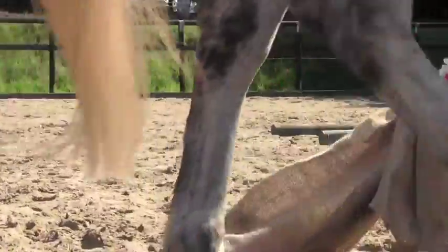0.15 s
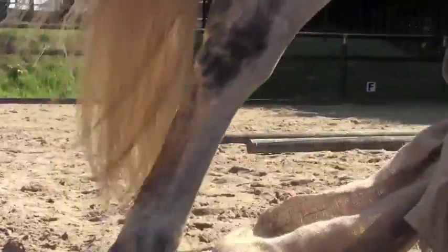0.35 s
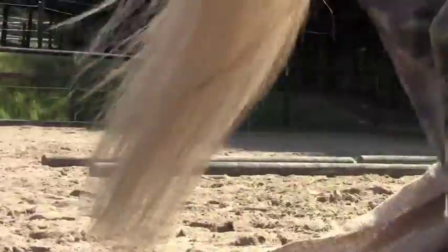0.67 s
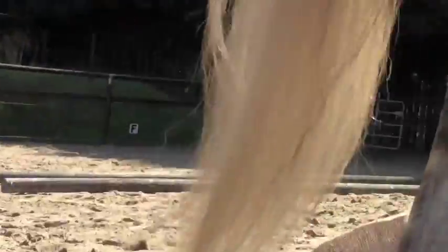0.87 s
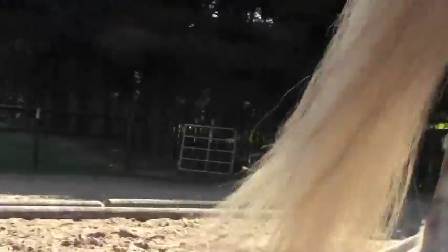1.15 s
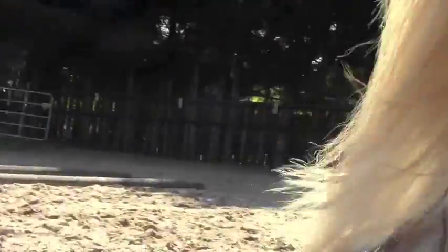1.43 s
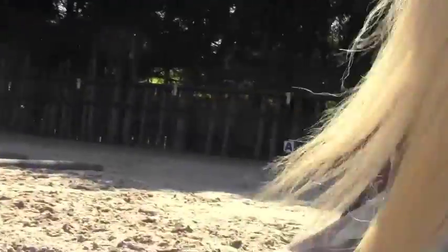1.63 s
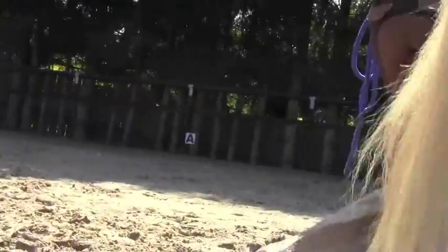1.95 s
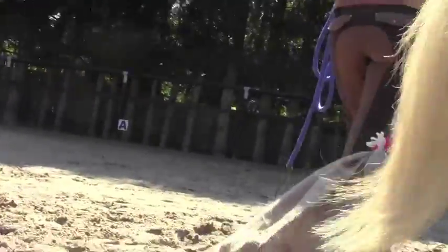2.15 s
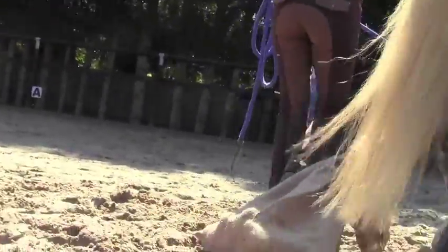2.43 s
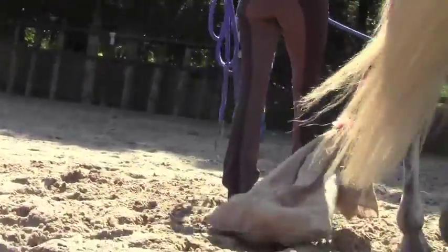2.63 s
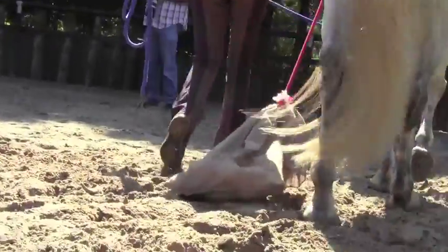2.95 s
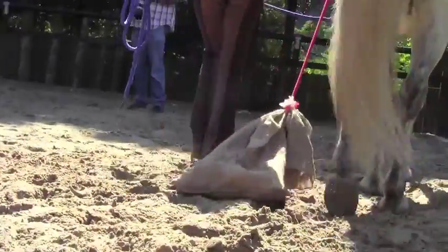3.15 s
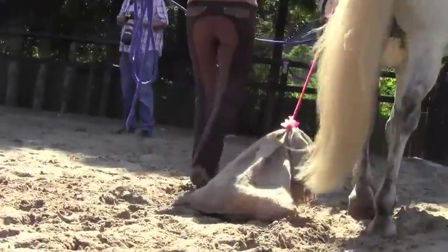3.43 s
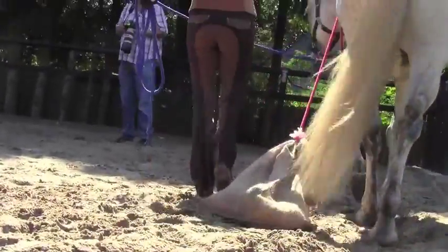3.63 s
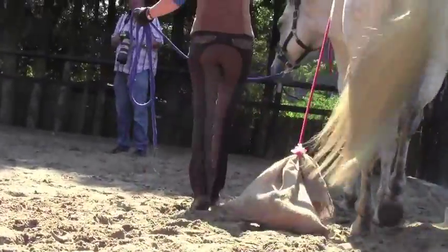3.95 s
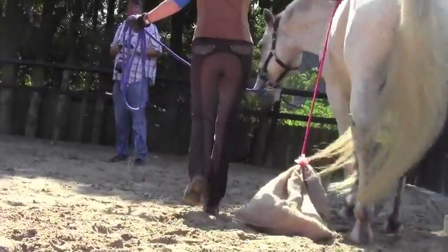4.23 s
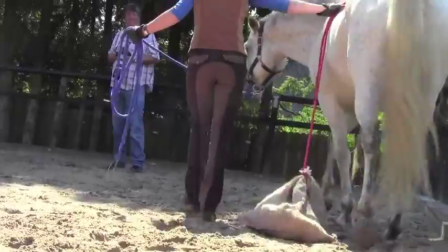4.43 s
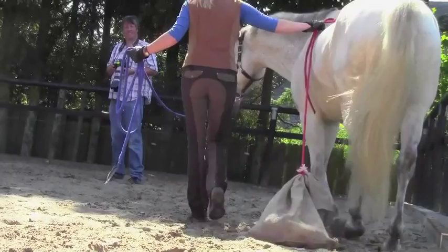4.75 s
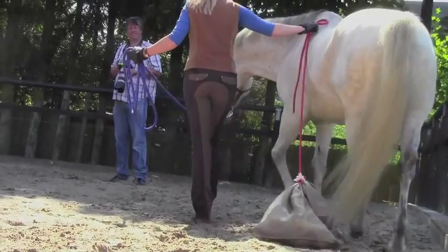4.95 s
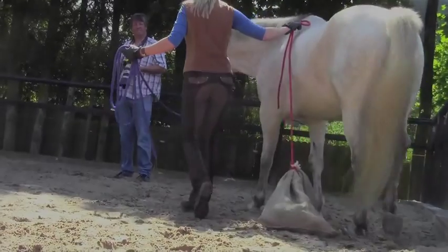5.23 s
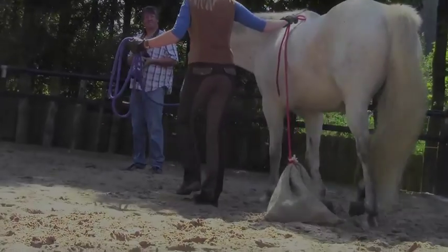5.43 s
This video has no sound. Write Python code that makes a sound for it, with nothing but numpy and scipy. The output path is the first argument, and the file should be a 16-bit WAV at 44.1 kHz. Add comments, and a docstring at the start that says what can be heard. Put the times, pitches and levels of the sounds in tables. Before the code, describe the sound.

Empty plastic bottles knock hollowly in a cloth sack a horse drags over sand, growing fainter, with soft hoof thuds and distant birds.

```python
"""Empty plastic bottles knock hollowly in a cloth sack as a horse drags it away, off to the left.
Each bump rings the air and walls of a bottle, hard caps tick, and cloth and hooves scuff and thud
in the sand of an arena. A distant bird gives blurred, falling whistles, with a lower call farther off.
Behind it all are the outdoor hush and a light breeze that rumbles and bumps on the microphone."""
import sys
import numpy as np
from scipy import signal
from scipy.fft import rfft, irfft, next_fast_len
from scipy.io import wavfile
from scipy.ndimage import uniform_filter1d

SR = 44100
rng = np.random.default_rng(int(sys.argv[2]) if len(sys.argv) > 2 else 0)


def master_out(mix):
    """Clip the mix to full scale and print it as 16-bit PCM to the path in sys.argv[1]."""
    frames = np.transpose(np.atleast_2d(mix))
    ceiling = np.clip(frames, -1, 1)
    pcm = np.round(ceiling * 32767).astype(np.int16)
    wavfile.write(sys.argv[1], SR, pcm)


N = 246149

# Bottle hitting bottle: start_s, level_db, air_hz, wall_hz, wall_db, neck_db, tumble_s
# (wall_db and neck_db are added to level_db, the level of the hollow air note)
BOTTLE_KNOCKS = [(.014, -24, 390, 720, -3, -7, 0.0061), (.086, -21.5, 427, 840, 0, -15, 0.026),
                 (.109, -25.5, 470, 740, -16, -6, 0.016), (0.124, -19, 402, 800, -3.5, -1.5, 0.017),
                 (0.144, -19, 418, 1010, 6.5, -12, 0.0056), (.186, -19, 506, 797, -2.5, -12, 0.019),
                 (0.234, -18.5, 460, 1090, -6, -10, 0.0081), (.298, -14.5, 400, 1093, -5.5, -4.5, 0.023),
                 (0.373, -15.5, 536, 870, -3.5, 0.5, 0.017), (.411, -19.5, 405, 740, -3, -3.5, 0.042),
                 (.454, -23.5, 450, 1293, -1, -5.5, 0.012), (.559, -20, 434, 900, -7, -3.5, 0.015),
                 (.569, -27, 407, 992, 14, 4, 0.012), (.581, -18, 410, 974, 2, -18, 0.0069),
                 (.592, -16, 436, 940, -1.5, -3.5, 0.0071), (.659, -26.5, 465, 900, -2, -11, 0.0072),
                 (.711, -22.5, 404, 876, -1, -2.5, 0.035), (.752, -22, 475, 890, 1, -7, 0.018),
                 (.803, -26, 490, 900, -2, 3, 0.012), (.814, -15, 437, 915, -2, -3.5, 0.02),
                 (.947, -26.5, 524, 836, -2, -2.5, 0.015), (.972, -26.5, 390, 1120, -6.5, -4.5, 0.026),
                 (1.016, -30.5, 502, 770, -2, -3, 0.0054), (1.037, -46, 455, 866, -10, 8, 0.0058),
                 (1.101, -31, 462, 850, 9.5, 8, 0.013), (1.145, -27, 450, 880, -1, -2, 0.044),
                 (1.195, -31.5, 644, 870, 4.5, -2, 0.048), (1.211, -32.5, 500, 820, 6, 6.5, 0.012),
                 (1.243, -41, 426, 865, 13, -6, .012), (1.31, -17, 476, 804, -2.5, -9.5, 0.023),
                 (1.334, -18, 492, 835, -2.5, -7, 0.02), (1.458, -22, 516, 840, -3.5, -11, 0.0071),
                 (1.515, -32, 580, 890, 2, 0, 0.021), (1.537, -15.5, 505, 843, -2, -10, .012),
                 (1.553, -20, 507, 960, 2, -11, 0.018), (1.574, -16.5, 530, 883, -2.5, -16, 0.0057),
                 (1.597, -15.5, 487, 850, -10, -6, 0.019), (1.666, -30, 530, 800, -13, -4, .006),
                 (1.718, -16.5, 500, 906, 0, -0.5, 0.023), (1.807, -25, 430, 844, -0.5, -10, 0.027),
                 (1.853, -22.5, 430, 756, -2, -1.5, 0.023), (1.885, -28.5, 446, 805, 2.5, -2.5, 0.047),
                 (1.973, -22, 429, 780, -2.5, -2, 0.023), (2.063, -28, 542, 836, 3, -1, 0.015),
                 (2.086, -29, 467, 820, -3, -1, 0.023), (2.211, -27.5, 480, 800, -8, -5.5, 0.039),
                 (2.312, -25.5, 648, 790, -8, -6, 0.047), (2.405, -30.5, 470, 805, -11, -2.5, 0.0099),
                 (2.448, -34, 483, 820, -3, 7, 0.0071), (2.457, -9.5, 399, 774, -8.5, -7, 0.013),
                 (2.487, -16, 477, 800, -14, -6, 0.019), (2.525, -16, 509, 840, -14.5, -7, 0.012),
                 (2.665, -18, 416, 720, -20, -12, 0.066), (2.703, -18.5, 468, 795, -17, -23, 0.04),
                 (2.731, -17, 590, 840, -20, -3, 0.0099), (2.771, -23.5, 495, 1040, -3, -4, 0.027),
                 (2.786, -31, 500, 855, -3, 5, .012), (2.826, -27, 406, 695, -8, -7, 0.044),
                 (2.924, -22, 477, 730, -24, -15, 0.021), (2.95, -22.5, 550, 626, -12, -4, 0.052),
                 (2.972, -12.5, 473, 900, -8.5, -10.5, 0.013), (3.025, -21, 420, 754, -5.5, -10.5, 0.036),
                 (3.145, -39, 655, 705, -16, -9, 0.009), (3.186, -30.5, 606, 740, -25, -12, 0.014),
                 (3.323, -33.5, 480, 785, -5, -12, 0.011), (3.441, -28.5, 426, 686, -11, -7, 0.03),
                 (3.5, -30.5, 573, 670, -10, -13, 0.02), (3.659, -32, 563, 700, -12, -4.5, 0.035),
                 (3.678, -28, 348, 664, -5, -8.5, 0.027), (3.755, -37.5, 515, 783, 3, -1, .02),
                 (3.774, -35, 664, 760, 7, -2, 0.0073), (3.8, -24, 644, 720, -12, -21, 0.016),
                 (3.843, -27, 414, 840, -10, -29, 0.022), (3.892, -25, 480, 789, -14, -11, .02),
                 (3.909, -25.5, 545, 750, -5, -12.5, 0.017), (3.992, -20.5, 410, 790, -12, -25, 0.034),
                 (4.047, -28, 594, 810, -19, -13, 0.0057), (4.099, -33.5, 570, 910, -15, -12, 0.0092),
                 (4.127, -29.5, 468, 830, -2, -12, 0.06), (4.217, -36.5, 534, 734, 2, -22, 0.025),
                 (4.254, -17.5, 420, 712, -6.5, -15, 0.03), (4.306, -32, 480, 690, 1, -9, 0.075),
                 (4.34, -28, 618, 673, 3.5, -8, 0.038), (4.398, -29.5, 497, 690, -3.5, -24, 0.0094),
                 (4.516, -32.5, 410, 670, -3, -14, 0.0089), (4.647, -32.5, 595, 781, -17, -27, 0.045),
                 (4.671, -30, 620, 696, -13, -24, .012), (4.692, -27, 648, 700, -12, -12.5, 0.018),
                 (4.706, -27, 513, 756, 0, -3, 0.02), (4.764, -28, 483, 730, -25, -13, 0.012),
                 (4.799, -23.5, 422, 682, -8, -17, 0.035), (4.837, -29.5, 550, 780, -19, -10, 0.016),
                 (4.967, -24, 420, 736, -6, -21, 0.019), (5.018, -28, 667, 940, -0.5, -7.5, 0.04),
                 (5.11, -29, 384, 737, -6, -17, 0.02), (5.155, -32, 584, 805, -12, -11, 0.0094),
                 (5.197, -33.5, 454, 910, 4, -11, 0.0096), (5.334, -35, 384, 1024, -11, -10, .03),
                 (5.413, -39, 440, 887, -1, -25, 0.014), (5.552, -37.5, 610, 850, -12, -11, .01)]
# Notes of a bottle's stiff neck: pitch_hz, level_db
NECK_NOTES = [(1370, 16), (1640, 17), (1770, 7), (2000, -43)]
# Notes of its thin panels: pitch_hz, level_db
PANEL_NOTES = [(2340, -39), (2580, 26), (3100, 20.5), (3450, 2.5), (4080, 9)]


def bottle_knocks():
    """Each knock is a short tumble of taps that rings one bottle's air, walls, neck and panels."""
    out, t = np.zeros(N), np.arange(3000) / SR
    hit_spots = rng.random((len(BOTTLE_KNOCKS), 24))
    rubs, catches = rng.standard_normal((2, len(BOTTLE_KNOCKS), 4, len(t)))
    for knock, spot, rub, catch in zip(BOTTLE_KNOCKS, hit_spots, rubs, catches):
        start_s, level_db, air_hz, wall_hz, wall_db, neck_db, tumble_s = knock
        contact = (1 - np.exp(-t / 0.0031)) * np.exp(-(t / max(tumble_s, .002)) ** 2)
        taps = contact * rub * (0.28 + (catch > 2.2))
        # the first touch is one firm tap
        strength = np.sqrt((taps ** 2).sum(1, keepdims=True))
        taps[:, :12] += 0.31 * strength * np.hanning(12) / 2
        # higher notes die sooner
        air = ring(taps[0], [(air_hz, 0), (1.27 * air_hz, -8)], [.5, spot[0]], fade_s=0.047)
        wall = ring(taps[1], [(wall_hz, 0), (1.163 * wall_hz, -14)], [.5, spot[1]], fade_s=0.033)
        neck = ring(taps[2], NECK_NOTES, spot[8:], fade_s=0.022)
        panels = ring(taps[3], PANEL_NOTES, spot[14:], fade_s=0.0066)
        for part, part_db in (air, 0), (wall, wall_db), (neck, neck_db), (panels, neck_db - 6):
            add(out, start_s, with_peak(part, level_db + part_db))
    return out


def ring(taps, notes, hit_spots, fade_s):
    """Taps ring notes that drop 60 dB in fade_s. Where the blow lands shifts their pitch and level."""
    t = np.arange(len(taps)) / SR
    tone = np.zeros(len(t))
    for (pitch_hz, level_db), spot in zip(notes, hit_spots):
        shifted_hz = pitch_hz * (1 + 0.097 * (spot - .5))
        tone += gain(level_db + 16 * spot - 60 * t / fade_s) * np.sin(2 * np.pi * shifted_hz * t)
    soft_start = 1 - np.exp(-t / (0.018 * fade_s))
    return signal.fftconvolve(taps, soft_start * tone)


# Caps and creases snapping: start_s, level_db, fade_s
CAP_TICKS = [(0.048, -31, .006), (0.126, -37, 0.0033), (0.138, -33, 0.0038), (0.298, -27.5, 0.0028),
             (0.3135, -24, 0.0045), (0.373, -28, 0.0028), (0.382, -27, 0.0038), (0.558, -31, 0.002),
             (0.711, -32, 0.0011), (0.753, -29.5, 0.0033), (0.802, -30, 0.0057), (0.979, -33, 0.01),
             (1.101, -28.5, 0.0038), (1.241, -32, 0.0043), (1.309, -23.5, 0.0027), (1.335, -27, .0047),
             (1.342, -28, .0017), (1.46, -32, 0.0025), (1.537, -25, .0021), (1.542, -17, 0.00069),
             (1.555, -29, 0.0013), (1.569, -27, 0.0029), (1.576, -19, 0.0018), (1.5975, -30, 0.0022),
             (1.6135, -27, .0024), (1.704, -27, 0.0017), (1.7205, -15.5, 0.0032), (1.7321, -22.5, 0.00098),
             (1.8226, -26, 0.0016), (1.837, -29, .0012), (1.856, -27, 0.0022), (1.871, -26.5, 0.00081),
             (1.982, -41, 0.0025), (2.075, -30, .0019), (2.137, -36, 0.003), (2.2099, -28.5, 0.0078),
             (2.242, -35.5, .0022), (2.31, -28, 0.0051), (2.325, -25, 0.003), (2.4545, -22.5, 0.0053),
             (2.4675, -24, 0.00081), (2.481, -22, 0.002), (2.526, -29, 0.0033), (2.725, -26, 0.003),
             (2.9, -31.5, 0.0011), (2.963, -28.5, 0.0045), (2.975, -29, 0.005), (3.2849, -37.5, 0.014),
             (3.693, -33.5, 0.0084), (3.802, -35.5, 0.009), (3.842, -38, .006), (3.912, -32, 0.0056),
             (3.986, -33.5, 0.0088), (4.107, -41.5, .0025), (4.253, -30, .0018), (4.269, -31.5, 0.0036),
             (4.335, -39.5, 0.0027), (4.672, -35, 0.0024), (4.797, -39, 0.0067), (4.835, -48, .004),
             (4.965, -39.5, .015), (5.112, -40.5, .0022), (5.194, -38, 0.004), (5.3513, -38.5, 0.0022)]
# Tone of the ticks: pitch_hz, boost_db
TICK_TONE = [(2500, 9), (3800, 9.5), (4900, 2.5), (5700, 5.5), (9000, 3.5), (11000, -10), (14000, -26.5),
             (15600, -42)]
# How soft ground thins the middle of far ticks: pitch_hz, boost_db
SOFT_GROUND = [(2500, -4), (5000, -4.5), (7000, -2.5), (9000, 2.5)]


def cap_ticks():
    """Hard caps and creases snap in tiny bright bursts, which thin out as the sack moves away."""
    out, t = np.zeros(N), np.arange(1000) / SR
    noises = rng.standard_normal((len(CAP_TICKS), len(t)))
    pitches_hz = 6400 + 3500 * (rng.random(len(CAP_TICKS)) - .5)
    for (start_s, level_db, fade_s), noise, pitch_hz in zip(CAP_TICKS, noises, pitches_hz):
        burst = noise * (1 - np.exp(-t / 0.00017)) * np.exp(-t / fade_s)
        tick = 1.35 * burst + resonate(burst, pitch_hz, width_hz=2500)
        add(out, start_s, with_peak(tick, level_db))
    near_s, far_s = 2, 4.4
    far = np.interp(np.arange(N) / SR, [near_s, far_s], [0, 1])
    return shape_tone((1 - far) * out + shape_tone(far * out, SOFT_GROUND), TICK_TONE)


# The sack's steady slide: time_s, bottles_db, hiss_db
SACK_SLIDE = [(0, -37, -49), (.3, -36.5, -51.5), (.55, -45, -50.5), (.85, -35, -51), (1.05, -45.5, -49),
              (1.2, -36.5, -46.5), (1.45, -48, -53), (1.85, -41, -52.5), (2.27, -48.5, -56),
              (2.61, -43, -55.5), (2.85, -37.5, -52.5), (3.1, -50.5, -54), (3.3, -46.5, -56),
              (3.58, -55, -61.5), (4.2, -42.5, -59.5), (4.52, -59, -69), (4.85, -46.5, -60.5),
              (5.25, -51, -89), (5.58, -55, -79)]
# Cloth and hooves pushing through sand: middle_s, length_s, hiss_db, bottles_db
SAND_PUSHES = [(0.127, .12, -45, -45), (0.379, 0.18, -43, -32.5), (0.568, 0.085, -42.5, -37.5),
               (0.707, 0.053, -46.5, -37), (0.824, 0.1, -44, -30.5), (1.11, 0.056, -51, -35.5),
               (1.346, 0.083, -44.5, -25.5), (1.575, 0.1, -38, -29.5), (1.719, 0.086, -43, -31),
               (1.88, 0.13, -46.5, -41.5), (1.984, .06, -49.5, -52), (2.096, 0.089, -43, -33),
               (2.21, 0.087, -52, -45), (2.336, 0.049, -46.5, -31), (2.496, 0.088, -42, -24),
               (2.713, 0.093, -43.5, -33.5), (2.785, 0.041, -46, -38), (3.001, 0.15, -49, -34.5),
               (3.667, 0.075, -58, -45), (3.814, .1, -49, -40), (3.998, .04, -48.5, -36),
               (4.124, 0.072, -56, -57), (4.264, 0.13, -53.5, -48), (4.436, 0.1, -52, -47),
               (4.701, 0.069, -53, -36.5), (4.797, 0.094, -52, -49), (5.009, 0.092, -48.5, -42)]
# Notes of many bottles stirring together: pitch_hz, width_hz, level_db
JOSTLE_NOTES = [(397.4, 41, 4.5), (498.5, 38, 4.5), (616, 35, -8.5), (777, 91, -0.5), (1030, 144, -2.5),
                (1420, 42, -13), (1680, 256, -4.5)]
# Tone of cloth on sand: pitch_hz, boost_db
SAND_TONE = [(880, -4.5), (1500, 9), (1650, -47), (2220, 4.5), (3090, 0), (4100, -3), (4990, -10.5),
             (5550, -3.5), (7890, -7), (12600, -16), (15500, -53)]


def sack_drag():
    """Countless small bumps ring the bottles, while sand grains hiss and crackle under the cloth."""
    t = np.arange(N) / SR
    push_hiss, push_bottles = np.zeros((2, N))
    for middle_s, length_s, hiss_db, bottles_db in SAND_PUSHES:
        swell = np.exp(-(2 * (t - middle_s) / length_s) ** 2)
        push_hiss += gain(hiss_db) * swell
        push_bottles += gain(bottles_db) * swell
    bottles = np.zeros(N)
    for pitch_hz, width_hz, level_db in JOSTLE_NOTES:
        bumps = clicks(per_s=260, spread_db=3.44) + 0.13 * rng.standard_normal(N)
        note = resonate(bumps, pitch_hz, width_hz)
        bottles += gain(level_db) * unit_level(resonate(note, pitch_hz, 8.6 * width_hz))
    grains = unit_level(clicks(per_s=2500, spread_db=13))
    sand = shape_tone(grains + 2.4 * rng.standard_normal(N), SAND_TONE)
    clumps = gain(2.4 * wobble(300))  # the cloth slips unevenly
    time_s, slide_bottles_db, slide_hiss_db = np.transpose(SACK_SLIDE)
    bottle_level = np.hypot(gain(np.interp(t, time_s, slide_bottles_db)), push_bottles)
    sand_level = np.hypot(gain(np.interp(t, time_s, slide_hiss_db)), push_hiss)
    return bottle_level * unit_level(bottles) + sand_level * clumps * unit_level(sand)


# Hooves and sack landing, plus two deep bumps of breeze on the microphone: start_s, level_db, pitch_hz
LOW_THUDS = [(.072, -46, 245), (0.289, -49, 235), (0.386, -39, 89), (.78, -47, 62), (1.528, -34.5, 203),
             (1.714, -33, 234), (2.06, -37, 287), (2.448, -55, 250), (2.962, -37, 258), (3.663, -40, 249),
             (3.98, -45, 240), (4.964, -43.5, 225)]


def low_thuds():
    """Each soft thud, a landing in sand or a bump of breeze, is a low note that swells in and dies."""
    out, t = np.zeros(N), np.arange(9000) / SR
    fade_s = 0.078
    swell = (1 - np.exp(-t / 0.018)) * gain(-60 * t / fade_s)
    for start_s, level_db, pitch_hz in LOW_THUDS:
        add(out, start_s, with_peak(swell * np.sin(2 * np.pi * pitch_hz * t), level_db))
    return out


def echoes_and_fizz(sound):
    """Faint, quick echoes from the fence and trees, plus a high fizz, both different on each side."""
    t = np.arange(SR // 3) / SR
    signs = rng.choice([-1., 1.], (2, len(t)))
    arrives = (rng.random((2, len(t))) < .05) & (t > .004)
    taps = signs * arrives * gain(-60 * t / 0.15)
    echoes = signal.fftconvolve(sound[None], taps / np.linalg.norm(taps[0]), axes=1)[:, :N]
    # the last boost adds a faint, wide fizz in the very highest treble
    return shape_tone(echoes, [(1500, -14.5), (5000, -14), (10000, -34), (12500, 8)])


# The nearer bird's calls: start_s, length_s, level_db, first_pitch_hz
FALLING_CALLS = [(.45, 0.23, -52, 3950), (1.483, 0.2, -43, 3900), (3.353, 0.23, -47, 4100),
                 (3.55, 0.18, -49.5, 3470), (3.846, 0.13, -54.5, 3870)]


def nearer_bird():
    """Each whistle slides down toward the same low note while its loudness flutters."""
    low_hz, slide_s, flutter_db = 3150., 0.072, 2
    t, pitch_hz, level = np.arange(N) / SR, np.full(N, low_hz), np.zeros(N)
    for start_s, length_s, level_db, first_pitch_hz in FALLING_CALLS:
        calling = (t > start_s) & (t < start_s + length_s)
        age_s = t[calling] - start_s
        pitch_hz[calling] += (first_pitch_hz - low_hz) * np.exp(-(age_s / slide_s) ** 2)
        level[calling] = gain(level_db) * np.sin(np.pi * (age_s / length_s) ** 0.78)
    level *= gain(flutter_db * wobble(400))
    return level * blurred_whistle(pitch_hz, width_hz=700)


# The farther bird's call: time_s, level_db, pitch_hz
LOW_CALL = [(1.3, -82, 1980), (1.37, -53, 1900), (1.62, -41.5, 1930), (1.72, -58, 1970), (2.62, -69, 2070),
            (2.7, -71, 2170), (2.92, -56, 2500), (2.98, -78, 2650)]


def farther_bird():
    """A lower whistle swells and fades far away."""
    t = np.arange(N) / SR
    time_s, level_db, pitch_hz = np.transpose(LOW_CALL)
    level = gain(np.interp(t, time_s, level_db, left=-150, right=-150))
    return level * blurred_whistle(np.interp(t, time_s, pitch_hz), width_hz=330)


def blurred_whistle(pitch_hz, width_hz):
    """Distance and leaves blur a whistle into a narrow band of noise."""
    band = resonate(rng.standard_normal(N), pitch_hz, width_hz)
    return unit_level(resonate(band, pitch_hz, width_hz))


# Tone of the hush: pitch_hz, boost_db
HUSH_TONE = [(12, -44), (20, -16), (180, 6), (315, 1.5), (393, 0), (452, 1), (534, 2), (1370, -13),
             (1720, -9), (2090, -12), (2540, -9.5), (4680, -19.5), (9380, -23.5), (14200, -37),
             (15500, -40)]
# How alike its left and right sides are: pitch_hz, likeness (1 = the same)
HUSH_LIKENESS = [(60, 0.97), (180, 0.74), (550, 0.16), (1650, 0.096), (4970, 0.72), (15000, 0.69)]


def outdoor_hush():
    """A soft, wide noise in which patches of pitch drift a little louder and quieter."""
    level_db = -49.5
    frames, hz = N // 256 + 5, np.fft.rfftfreq(1024, 1 / SR)
    noise = rng.standard_normal((frames, 513, 5)).T
    left, unrelated = noise[0] + 1j * noise[1], noise[2] + 1j * noise[3]
    patches_db = 1.5 * unit_level(uniform_filter1d(uniform_filter1d(noise[4], 12, 0), 14, 1))
    likeness = look_up(HUSH_LIKENESS, hz)[:, None]
    right = likeness * left + np.sqrt(1 - likeness ** 2) * unrelated
    spectra = np.array([left, right]) * gain(look_up(HUSH_TONE, hz)[:, None] + patches_db)
    _, hush = signal.istft(spectra, nperseg=1024, noverlap=768)
    return gain(level_db) * unit_level(hush[:, :N])


# Rise and fall of the breeze: time_s, level_db
BREEZE_GUSTS = [(0, -67), (.4, -59), (.8, -67), (1.1, -63.5), (4.9, -72), (5.3, -60), (5.58, -65)]


def breeze():
    """Air blowing on the microphone makes a low, lumpy rumble, partly different on each side."""
    time_s, level_db = np.transpose(BREEZE_GUSTS)
    level = gain(np.interp(np.arange(N) / SR, time_s, level_db))
    shared, left, right = (resonate(resonate(n, 69, 45), 51, 86) for n in rng.standard_normal((3, N)))
    return level * unit_level(shared + 0.5 * np.array([left, right]))


def gain(db):
    """Turns decibels into a number to multiply by."""
    return 10 ** (np.asarray(db) / 20)


def unit_level(sound):
    """Scales a sound to an average (rms) level of 1."""
    return sound / np.sqrt(np.mean(sound ** 2) + 1e-20)


def with_peak(sound, db):
    """Scales a sound so its highest peak is at db."""
    return gain(db) * sound / (abs(sound).max() + 1e-12)


def look_up(table, hz):
    """Reads between the rows of a (pitch_hz, value) table, spacing octaves evenly."""
    pitch_hz, value = np.transpose(table)
    return np.interp(np.log(hz + 1), np.log(pitch_hz + 1), value)


def shape_tone(sound, table):
    """Turns pitches up or down by a (pitch_hz, boost_db) table."""
    size = next_fast_len(N)
    boost_db = look_up(table, np.fft.rfftfreq(size, 1 / SR))
    return irfft(rfft(sound, size) * gain(boost_db), size)[..., :N]


def add(mix, start_s, sound):
    """Mixes a sound in at start_s."""
    part = mix[round(start_s * SR):][:len(sound)]
    part += sound[:len(part)]


def resonate(sound, pitch_hz, width_hz):
    """Keeps a band around a steady or moving pitch: shift it to zero, smooth, shift back."""
    turn = np.exp(2j * np.pi * np.cumsum(pitch_hz * np.ones(len(sound))) / SR)
    decay = np.exp(-np.pi * width_hz / SR)
    return 2 * (turn * signal.lfilter([1 - decay], [1, -decay], sound / turn)).real


def clicks(per_s, spread_db):
    """Scattered random clicks, a few of them large."""
    size = gain(spread_db * np.minimum(rng.exponential(1, N), 4))
    return size * rng.choice([-1., 1.], N) * (rng.random(N) < per_s / SR)


def wobble(samples):
    """A random up-and-down curve; smoothing over more samples makes it slower."""
    return unit_level(uniform_filter1d(uniform_filter1d(rng.standard_normal(N), samples), samples))


# The sack loses deep bass and high treble at the microphone: pitch_hz, boost_db
SACK_TONE = [(20, -54), (120, -3), (260, -6.5), (340, -6), (10000, 2.5), (13000, -15), (15600, -15)]
# How much louder the sack is on the left: pitch_hz, left_minus_right_db
SACK_BALANCE = [(60, 1), (130, -4), (290, 2.5), (640, 4.5), (1410, 3.5), (3100, 2.5), (6820, -1),
                (15000, 6)]


def scene():
    """The sack sits to the left; thuds and birds stay near the centre."""
    sack = shape_tone(bottle_knocks() + sack_drag(), SACK_TONE) + cap_ticks()
    pitch_hz, lean_db = np.transpose(SACK_BALANCE)
    sides = np.array([shape_tone(sack, np.transpose([pitch_hz, side * lean_db])) for side in (.5, -.5)])
    sides += echoes_and_fizz(sack)
    birds = (nearer_bird() + farther_bird()) * gain([[.8], [-.8]])
    return sides + low_thuds() + birds + outdoor_hush() + breeze()


def record(dry):
    """Cuts away the treble above top_hz."""
    top_hz = 15640
    low_pass = signal.firwin(2047, top_hz, window=("kaiser", 9), fs=SR)
    return signal.oaconvolve(dry, low_pass[None], "same")


dry = scene()
out = record(dry)
master_out(out)
```